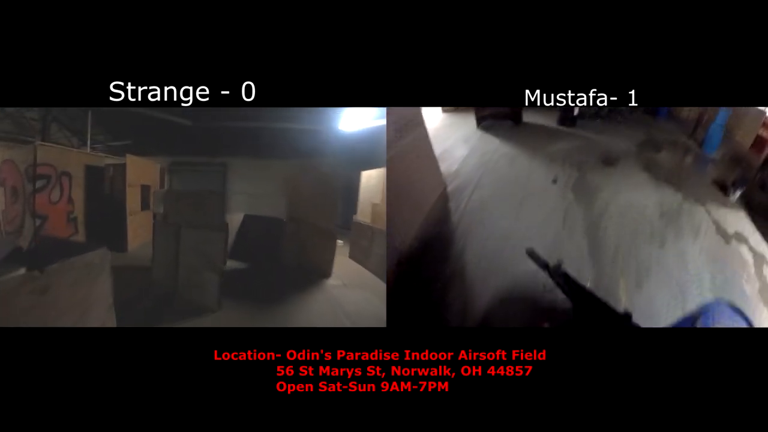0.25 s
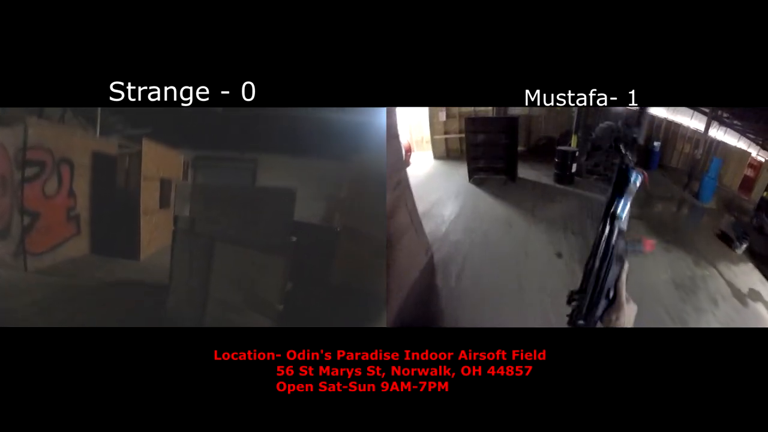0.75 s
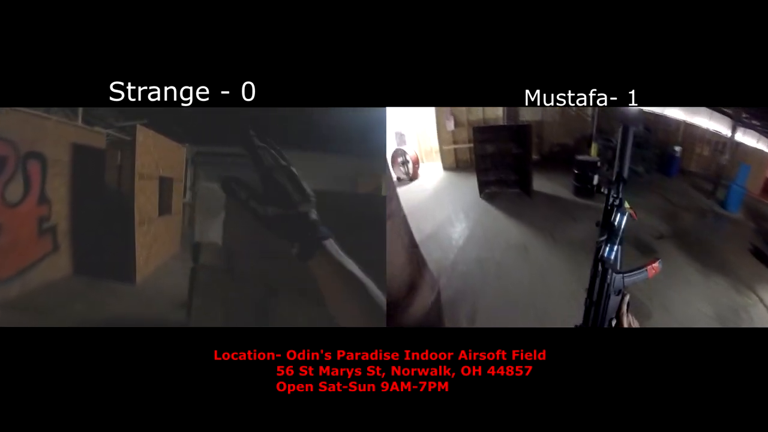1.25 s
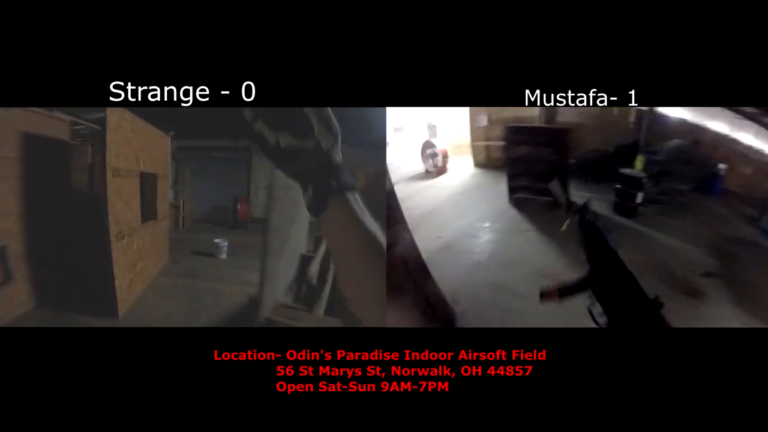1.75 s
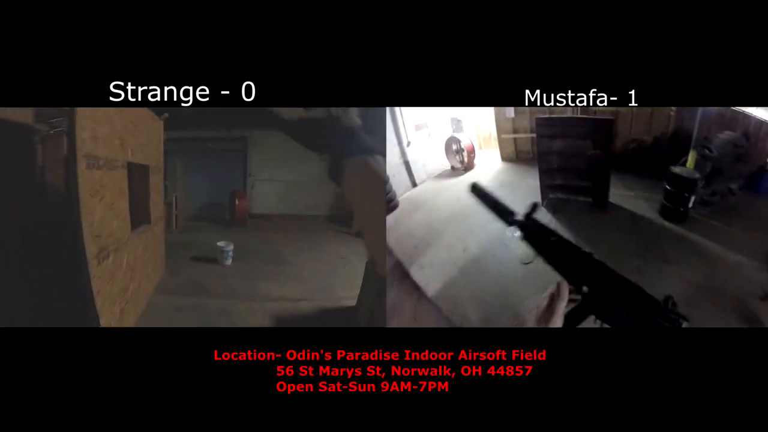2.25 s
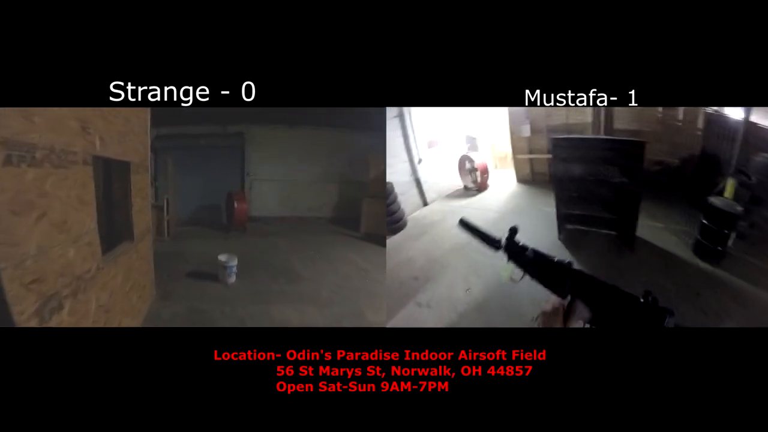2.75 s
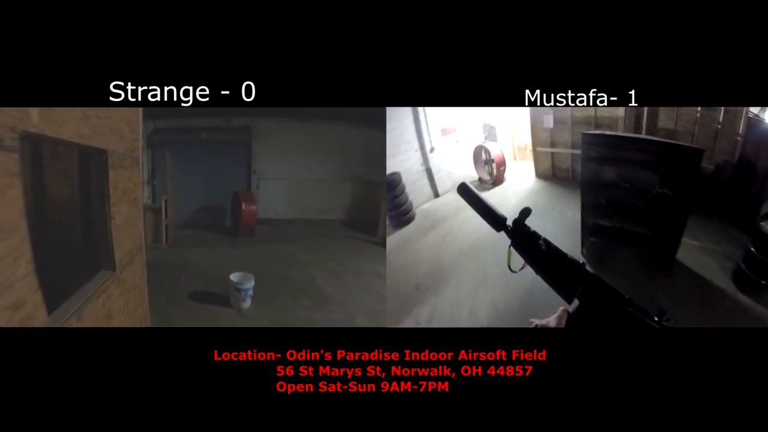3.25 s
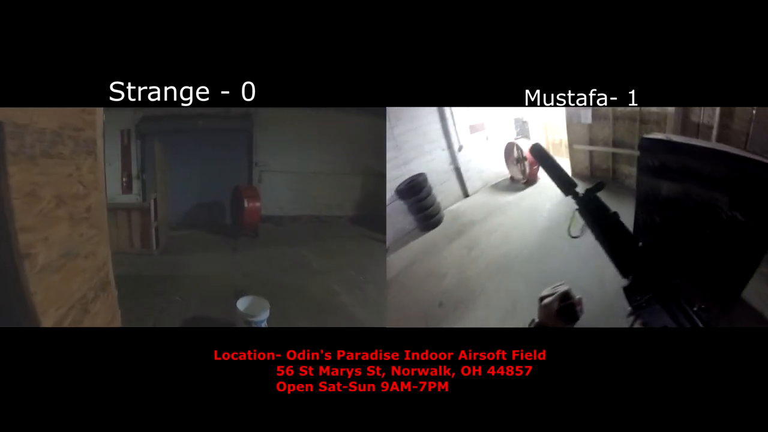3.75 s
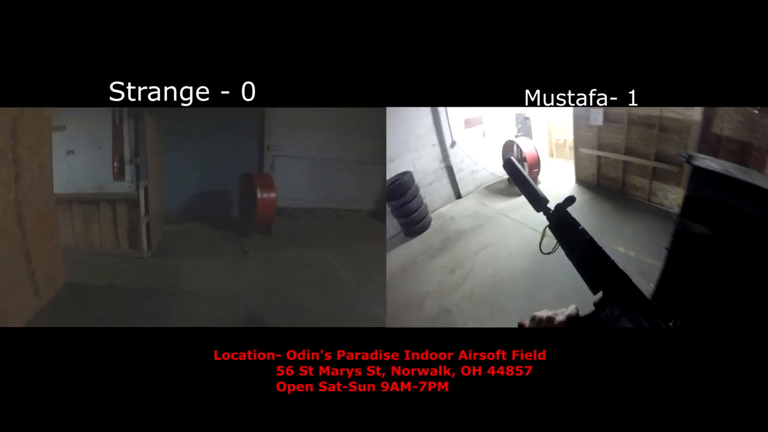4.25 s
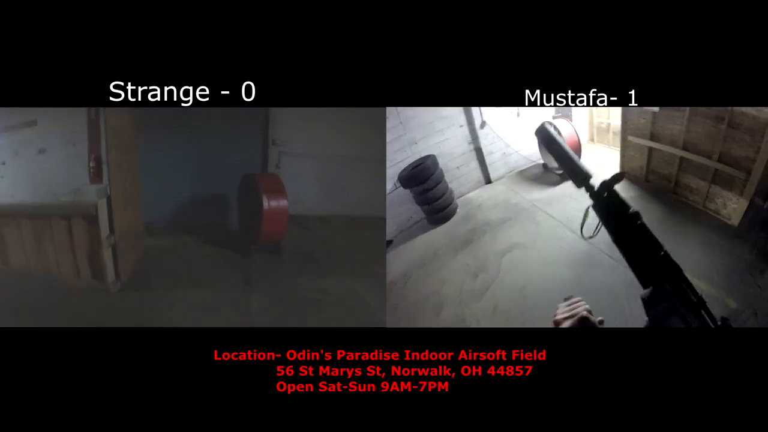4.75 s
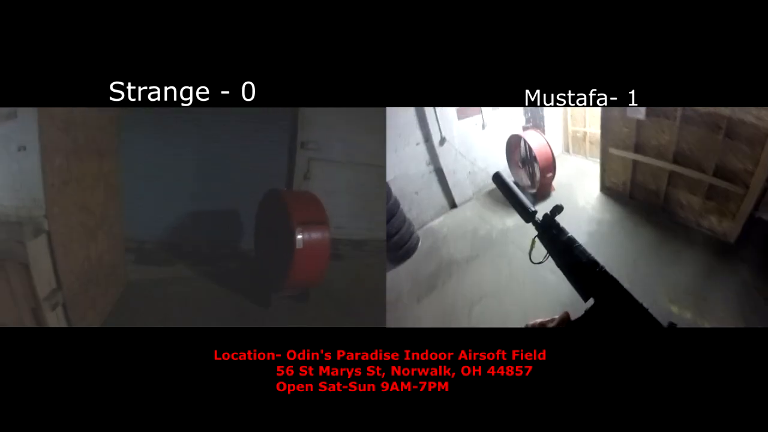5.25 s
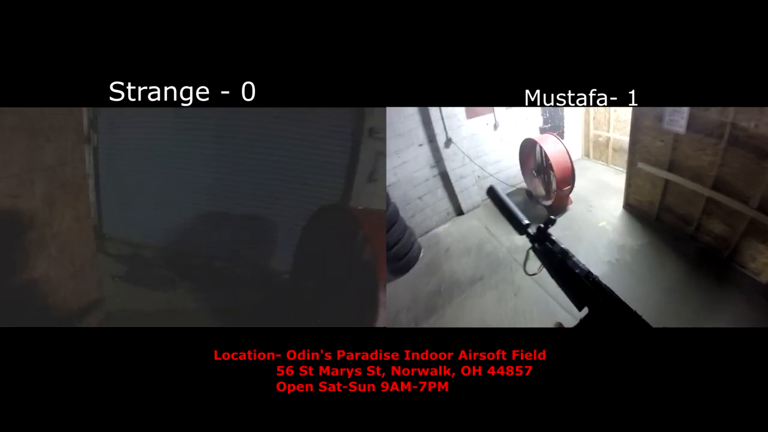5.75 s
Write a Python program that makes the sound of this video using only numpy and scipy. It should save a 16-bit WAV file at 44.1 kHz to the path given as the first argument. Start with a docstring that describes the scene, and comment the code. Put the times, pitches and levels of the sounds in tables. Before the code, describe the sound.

A low, wavering ventilation rumble fills a large hall for the whole six seconds. Two people walk, heard from microphones worn on their heads, their heels landing as soft, very deep, uneven thuds. For the first two seconds, plastic gear and buckles click busily right by the microphone, with tiny metal pings, a few faint knocks and rustling cloth. The clicks thin out, return briefly around 2.5 seconds, then cluster again near 3.4, 4.3 and 5.1 seconds. From about 3 seconds, the rushing air of a big drum fan fades in and grows steadily louder. From about 4.2 seconds, one blade grazes its guard with a short, high tick three or four times a second, getting clearer. Dull close knocks come between 5.2 and 5.5 seconds, and in the last second the fan's draught buffets the right side in low gusts.

```python
"""Walking up to a drum fan in a large hall

Two walkers wear cased head cameras, the first mono, the second stereo. Heel thuds come up through the
body; right by the microphones buckles and plastic gear click and cloth rustles. Farther off the
ventilation rumbles. A big drum fan grows louder as it is approached, one blade ticking once a turn,
its draught buffeting the second camera's right microphone port."""
import sys
import numpy as np
from scipy import signal
from scipy.fft import rfft, irfft, next_fast_len
from scipy.io import wavfile
from scipy.ndimage import uniform_filter1d, map_coordinates

SR = 44100
rng = np.random.default_rng(int(sys.argv[2]) if len(sys.argv) > 2 else 0)


def file_out(sig):
    """Save sig as 16-bit WAV at sys.argv[1]."""
    # one column per channel
    cols = np.atleast_2d(sig).T
    # limit, then scale
    lim = np.clip(cols, -1, 1)
    pcm = np.round(lim * 32767).astype(np.int16)
    wavfile.write(sys.argv[1], SR, pcm)


N = 264291
TIME = np.arange(N) / SR


def amp(db):
    return 10 ** (np.asarray(db) / 20)


def unit_rms(x):
    return x / np.sqrt(np.mean(x ** 2) + 1e-20)


def along(points, hz):
    """Interpolates (f/Hz, value) points on a log frequency axis."""
    f, values = np.transpose(points)
    return np.interp(np.log(hz + 1), np.log(f + 1), values)


def curves(rows):
    """One value per sample for each column after the time."""
    times, *columns = np.transpose(rows)
    return [np.interp(TIME, times, column) for column in columns]


def wobble(rate):
    """A smooth random curve, rate knots a second."""
    return map_coordinates(rng.standard_normal(int(N * rate / SR) + 4), [TIME * rate])


def filtered(x, response):
    """Passes x through a complex response of frequency."""
    size = next_fast_len(N + SR // 2)
    return irfft(rfft(x, size) * response(np.fft.rfftfreq(size, 1 / SR)), size)[..., :N]


def lowpass(hz, cutoff_hz):
    return 1 / (1 + (hz / cutoff_hz) ** 4)


def resonances(modes, hz):
    """Causal response of (f/Hz, width/Hz, gain/dB) modes of alternating sign."""
    return sum((-1) ** k * amp(db) * 1j * hz * width / (centre ** 2 - hz ** 2 + 1j * hz * width)
               for k, (centre, width, db) in enumerate(modes))


def causal(gain):
    """The minimum-phase response with this gain: its sound starts at the blow."""
    cepstrum = irfft(np.log(gain + 1e-6))
    half = len(cepstrum) // 2
    return np.exp(rfft(np.r_[cepstrum[0], 2 * cepstrum[1:half], cepstrum[half], np.zeros(half - 1)]))


def rush(response, patchy_db, channels=1):
    """Coloured noise of rms 1 with patches of random gain in time and frequency."""
    spectra = signal.stft(rng.standard_normal((channels, N)), nperseg=512)[2]
    patches = uniform_filter1d(uniform_filter1d(rng.standard_normal(spectra.shape[1:]), 6, 0), 14, 1)
    noise = signal.istft(spectra * amp(patchy_db * unit_rms(patches)), nperseg=512)[1][:, :N]
    return unit_rms(filtered(noise, response))


def hum(hz, width_hz):
    """A tone of rms 1 that wavers in level and phase within a narrow band."""
    drift = filtered(rng.standard_normal((2, N)), lambda f: lowpass(f, width_hz))
    phase = 2 * np.pi * np.cumsum(hz * np.ones(N)) / SR
    return unit_rms((drift[0] + 1.8 * np.std(drift)) * np.cos(phase) + drift[1] * np.sin(phase))


def add(track, s, sound):
    """Mixes a sound in at time s."""
    part = track[round(s * SR):][:len(sound)]
    part += sound[:len(part)]


# Ventilation drones across the hall: t/s, deep f/Hz, deep relative level/dB, upper pair's ditto/dB
DRONES = [(0, 104, -34, -33), (.15, 106, -42, -43), (.35, 106, -38, -34), (.85, 95, -48, -36),
          (1, 108, -50, -34), (1.6, 85, -42, -39), (2.5, 105, -44, -40), (3.1, 99, -44, -48),
          (3.45, 95, -39, -44), (3.8, 98, -38, -50), (4.1, 94, -29.5, -42), (4.3, 93, -31, -44),
          (4.4, 93, -40, -44), (4.85, 100, -40, -39), (5.1, 90, -40, -41), (5.4, 82, -36, -42),
          (5.85, 79, -32, -48), (5.99, 77, -42, -40)]
# Pitch of the middle drone: t/s, f/Hz
MIDDLE_PITCH = [(0, 130), (.4, 127), (.85, 137), (1.05, 127), (1.6, 123), (2.2, 139), (2.9, 138),
                (3.4, 130), (5.99, 130)]
# Duct resonances: f/Hz, width/Hz, gain/dB
DUCT_MODES = [(24.728, 21.57, 0), (46.607, 18.193, 3.5), (83.43, 83.59, -4), (143.24, 78.49, -2),
              (229.46, 80.7, -8)]


def ventilation():
    """Ducts rumble under three wavering drones, the deepest with its octave, and two faint tones."""
    deep_hz, deep_db, pair_db = curves(DRONES)
    deep = amp(deep_db - 2.5) * hum(deep_hz, width_hz=12.702)
    middle = amp(pair_db - 3.5 + .7 * wobble(3.0084)) * hum(curves(MIDDLE_PITCH)[0], width_hz=6)
    upper = amp(pair_db - 5 + .7 * wobble(3.0114)) * hum(156 + 2.5 * wobble(2.5), width_hz=6)
    octave = amp(deep_db - 13) * hum(2 * deep_hz, width_hz=9.52)
    tones = amp(-66.5) * hum(799, width_hz=32.1) + amp(-64.5) * hum(1054, width_hz=44.37)
    rumble_db = -35 + .4474 * wobble(3.2723)
    rumble = rush(lambda hz: resonances(DUCT_MODES, hz) * lowpass(hz, 300), patchy_db=-.5988)
    return deep + middle + upper + octave + tones + amp(rumble_db) * rumble


# Room tone from the far parts of the hall: f/Hz, relative density/dB
HALL_SPECTRUM = [(120, -33), (200, -4.5), (300, -7.5), (420, -17), (680, -24.5), (800, -21), (900, -23.5),
                 (1060, -20), (1400, -25.5), (2300, -31.5), (4300, -38.5), (5100, -42), (6000, -47.5),
                 (10000, -51.5), (15500, -65)]
# Room tone along the walk: t/s, level/dB
HALL_LEVELS = [(0, -46.5), (2, -46.5), (4, -44.5), (5, -43.5), (5.99, -40.5)]
OPENING_S = .04965  # time scale of a rush that dies away in the first moment


def hall():
    """Distant broad noise, briefly louder at the start, then rising slowly."""
    level_db = curves(HALL_LEVELS)[0] + 11 * np.exp(-TIME / OPENING_S)
    return amp(level_db) * rush(lambda hz: amp(along(HALL_SPECTRUM, hz)), patchy_db=1)


# The fan from close by: f/Hz, relative density/dB
FAN_SPECTRUM = [(20, -17.5), (60, 3.5), (90, -11.5), (170, -8), (230, -2), (330, -9.5), (450, -13.5),
                (790, -16.5), (1150, -15), (1500, -22.5), (2000, -25.5), (2600, -37), (6400, -38),
                (8300, -37.5), (9200, -51.5), (15000, -60.5)]
# The fan as the second camera closes in, ahead of its ports: t/s, level/dB
FAN_APPROACH = [(2.65, -110), (2.8, -68.5), (3.1, -58), (3.6, -51.5), (4.6, -45.5), (5.99, -38)]


def fan():
    """Rushing air, a direct and a diffuse part: a short noise fades out at the very start, later the long
    approach."""
    opening = amp(-43 - 20 * TIME / OPENING_S)
    level = amp(curves(FAN_APPROACH)[0]) + opening
    return level * rush(lambda hz: amp(along(FAN_SPECTRUM, hz)), patchy_db=.5, channels=2)


# Knocks close to a camera: t/s, level/dB, f/Hz, t60/s, edge level/dB, camera (0 first, 1 second)
NEAR_KNOCKS = [(.028, -40, 800, .08, -52, 0), (.535, -40, 590, .05, -46, 0),
               (1.305, -40, 1050, .07, -60, 0), (1.46, -45, 800, .07, -58, 0), (1.76, -38, 248, .9, -70, 0),
               (5.174, -14.5, 187.7, 0.0556, -30, 1), (5.355, -26, 190, .06, -60, 1),
               (5.486, -18, 138.1, 0.13807, -59.5, 0)]


def knocks():
    """Dull knocks, one track per camera: a damped low mode with a short edge of noise."""
    bodies, edges = np.zeros((2, N)), np.zeros((2, N))
    t = np.arange(SR // 4) / SR
    attack = 1 - np.exp(-t / .003185)
    for s, db, hz, t60, edge_db, camera in NEAR_KNOCKS:
        add(bodies[round(camera)], s, -amp(db - 60 * t / t60) * np.sin(2 * np.pi * hz * t) * attack)
        add(edges[round(camera)], s, amp(edge_db - 60 * t / .02798) * rng.standard_normal(len(t)))
    return bodies + filtered(edges, lambda hz: resonances([(1500, 3000, 0)], hz) ** 2)


# Heels, heard at the head through the body: deepest swing t/s, peak level/dB, f/Hz, roll-out/cycles
HEEL_BLOWS = [(.069, -19.5, 24, 1), (.67, -21, 23, 1.2), (1.152, -26, 24, 1), (1.316, -22, 22, 1.2),
              (1.479, -18.5, 34, .6), (1.94, -20.5, 24, 1.2), (2.43, -30, 45, .8), (2.642, -22, 21, 1.3),
              (3.292, -19, 22, 1.8), (3.974, -22.5, 24, .8), (4.634, -19.5, 22, 1.8), (4.925, -28, 35, .8),
              (5.322, -22, 21, 1.5), (5.605, -26, 45, 1)]


def heel_thuds():
    """Each blow is a soft low swing that swells within a cycle and rolls out."""
    out, swell_cycles = np.zeros(N), .55
    for s, db, hz, roll_cycles in HEEL_BLOWS:
        cycles = (TIME - s) * hz
        envelope = np.exp(-(cycles / np.where(cycles < 0, swell_cycles, roll_cycles)) ** 2)
        out -= amp(db) * envelope * np.cos(2 * np.pi * cycles)
    return out


# Modes of the plastic gear at the microphone: f/Hz, width/Hz, gain/dB
GEAR_MODES = [(1700, 520, -3.5), (2323.3, 177.8, -9), (2600, 600, -3.5), (3450, 850, -3.5), (4100, 450, -8),
              (4470, 300, -6.5), (4850, 500, -8.5), (5620, 450, -4.5), (6000, 600, -4.5), (6500, 700, -4.5),
              (7385, 750, -2.5), (8503.7, 1053.7, -2), (11100, 2600, -6.5), (12400, 500, -5.5),
              (13831, 2723, -8)]
# Borders between the low, middle, upper and top groups of modes: f/Hz
GROUP_BORDERS = [2900, 5200, 7000]


def through_gear(drives):
    """Four signals each drive a group of modes; a mode acts twice, in the part and in the case."""
    def response(hz, group):
        modes = [mode for mode in GEAR_MODES if np.searchsorted(GROUP_BORDERS, mode[0]) == group]
        gain = sum(np.abs(resonances([mode], hz)) ** 2 for mode in modes)
        return causal(gain * lowpass(hz, cutoff_hz=[4500, 7494, 9458, 19960][group]))
    return [filtered(drive, lambda hz: response(hz, group)) for group, drive in enumerate(drives)]


# Buckles and gear touching, close up:
# t/s, relative level/dB, low share/dB, upper share/dB, top share/dB, ring f/Hz, ring offset/dB
GEAR_CONTACTS = [(0.0933, -46, -3, -7, -13.5, 3560, -17), (0.1104, -54, -5, -5, -8, 3850, -9),
                 (0.126, -48, -6, -4, -12, 3900, -9), (0.1427, -47, -15, -4, -15, 3920, -16),
                 (0.1674, -41, -21, -20, -17, 4040, -7), (0.1903, -48, -4, -7, -14, 1650, -7),
                 (0.2055, -51, -2, -5, -11, 2720, -6), (0.2185, -52, -11, -3, -15, 1670, -7),
                 (0.3363, -51, -5, -16, -14, 3280, -7), (0.4205, -48, -9, -29, -26, 2770, -14),
                 (0.4728, -40, -12, -9, -17, 3600, -14), (0.493, -45, -5, -20, -35, 2720, -14),
                 (0.5195, -50, -12, -3, -9, 4140, -22), (0.616, -41, -5, -8, -14, 1850, -10),
                 (.6234, -50, -6, -2, -12, 5910, -9), (0.6546, -42, -2, -16, -15, 1850, -8),
                 (0.7076, -44, -4, -6, -7, 1840, -8), (0.7157, -52, -3, -1, -11, 3460, -10),
                 (0.7588, -51, -4, -12, -12, 3880, -14), (0.8842, -45, -17, -12, -15, 4460, -5),
                 (0.8947, -53, -7, -10, -14, 4100, -12), (.9094, -51, -15, -14, -16, 4100, -6),
                 (0.9322, -43, -17, -12, -14, 4450, -6), (0.9783, -47, -9, -10, -11, 4500, -6),
                 (1.0782, -53, -6, -8, -8, 2840, -11), (1.1405, -46, -8, -10, -16, 4450, -13),
                 (1.1667, -49, -9, -9, -15, 4540, -12), (1.2053, -51, -3, -10, -10, 3400, -8),
                 (1.267, -62, -12, -7, -4, 8700, -12), (1.2855, -53, -3, -11, -9, 2220, -12),
                 (1.341, -61, -12, -4, -6, 5600, -12), (1.4254, -61, -12, -3, -5, 5600, -12),
                 (1.4964, -53, -6, -16, -26, 3050, -6), (1.5234, -53, -6, -16, -22, 3460, -6),
                 (1.5474, -58, -12, -2, -14, 5680, -9), (1.559, -50, -6, -8, -9, 3210, -18),
                 (1.6002, -47, -8, -10, -5, 4490, -18), (1.6154, -54, -6, -6, -8, 2960, -16),
                 (1.6304, -53, -8, -5, -6, 3210, -12), (1.6664, -59, -8, -8, -5, 7700, -12),
                 (1.7099, -48, -8, -14, -26, 3050, -8), (1.7594, -52, -10, -14, -22, 3300, -9),
                 (1.8083, -50, -17, -13, -30, 3540, -7), (1.8194, -57, -15, -2, -24, 6080, -9),
                 (2.4404, -53, -4, -15, -23, 3430, -18), (2.4808, -46, -11, -12, -30, 4370, -1),
                 (2.5606, -51, -4, -8, -24, 4330, -14), (2.6102, -55, -17, -13, -33, 4380, 6),
                 (3.203, -43, -5, -12, -28, 3360, -10), (3.2234, -51, -17, -4, -21, 3680, -11),
                 (3.293, -42, 0, -36, -36, 2070, -7), (3.3423, -48, -1, -18, -36, 1880, -5),
                 (3.3558, -43, -4, -24, -41, 2540, -11), (3.3685, -46, 0, -17, -33, 1800, -6),
                 (3.3839, -41, -1.5, -11, -27, 1600, -7), (3.407, -35, -3, -15, -28, 3700, -10),
                 (3.4388, -50, -11, -7, -22, 2540, -12), (3.453, -41, -18, -2, -18, 4470, -27),
                 (3.4686, -45, -15, -5, -24, 3860, -20), (3.483, -40.5, -10, -6, -24, 4320, -22),
                 (3.5085, -47, -6, -6, -27, 3350, -13), (3.6464, -56, -8, -5, -19, 3160, -17),
                 (3.9073, -59, -9, -6, -2, 1830, -16), (3.9684, -42, 0, -35, -41, 2080, -7),
                 (4.0607, -56, -5, 0, -30, 2420, -20), (4.1904, -41, -2, -16, -28, 1750, -11),
                 (4.2078, -42, -2, -6, -24, 2520, -23), (4.2245, -49, -3, -6, -18, 1670, -6),
                 (4.3156, -46, -1, -21, -29, 1860, -17), (4.3314, -50, -15, -1, -21, 4180, -14),
                 (4.3723, -43, -1, -11, -25, 1700, -13), (4.4398, -46, -1, -20, -30, 2540, -9),
                 (4.4465, -65, -6, -6, -4, 10500, -12), (4.5654, -56, -10, -1, -27, 2650, -11),
                 (4.6498, -44, 0, -28, -32, 2050, -4), (5.1154, -48, -3, -8, -25, 3560, -10),
                 (5.1349, -40, -3, -12, -25, 3550, -10), (5.1733, -46, -2, -10, -37, 1740, -8),
                 (5.2526, -46, -2, -11, -29, 1700, -10), (5.5243, -34, -1, -24, -26, 2600, -8),
                 (5.5424, -49, -3, -4, -20, 3430, -10)]
RING_T60_CYCLES, RING_REFERENCE_CYCLES = 140, 19  # the ring offset holds at the reference cycle


def gear_clicks():
    """Each contact is a scratchy burst into the four groups of modes; the struck part rings on."""
    t = np.arange(SR // 20) / SR
    drives, rings = np.zeros((4, N)), np.zeros(N)
    rise_s = np.array([[.001], [.0006], [.0005], [.0004]])
    blow_t60 = np.array([[.022], [.017], [.013], [.009]])
    rattle_t60 = np.array([[.09], [.08], [.06], [.04]])  # treble dies first
    rise = 1 - np.exp(-t / rise_s)
    envelopes = (amp(-60 * t / blow_t60) + amp(-10.5 - 60 * t / rattle_t60)) * rise
    for s, db, low_db, upper_db, top_db, hz, ring_db in GEAR_CONTACTS:
        middle_power = max(1 - np.sum(amp([low_db, upper_db, top_db]) ** 2), .015)
        shares_db = [low_db, 10 * np.log10(middle_power), upper_db, top_db]
        for drive, share_db, envelope in zip(drives, shares_db, envelopes):
            burst = envelope * rng.standard_normal(len(t))
            burst = burst + .7 * np.roll(burst, rng.integers(12, 60))  # a near reflection colours it
            add(drive, s, amp(db + share_db) * burst * np.linalg.norm(envelope) / np.linalg.norm(burst))
        ring_level = amp(db + ring_db - 60 * (t * hz - RING_REFERENCE_CYCLES) / RING_T60_CYCLES)
        phase = 2 * np.pi * hz * t + np.cumsum(rng.normal(0, .02, len(t)))
        add(rings, s, ring_level * rise[1] * np.sin(phase))
    gains_db = [24, 24.5, 26.5, 27.5]
    return rings + sum(amp(db) * group for db, group in zip(gains_db, through_gear(drives)))


# Cloth and straps moving just by the microphone:
# peak t/s, relative level/dB, time to rise 10 dB/s, time to fall 10 dB/s, sheen offset/dB
CLOTH_STROKES = [(.12, -51.5, .04, .3, -10), (.2, -53, .1, .06, -8), (.4, -54, .2, .3, -18),
                 (.48, -50, .008, 0.1906, -12), (.625, -52, .008, 0.19, -12.5),
                 (.715, -53, .008, 0.1285, -5), (.84, -53, .12, .1, -22), (.895, -51, .01, .35, -11.5),
                 (1.15, -55, .01, 0.4911, -9.5), (1.5, -52, .08, 0.3337, -18), (1.62, -53, .05, .1, -8),
                 (1.74, -50.5, .18, .14, -21), (2.48, -56.5, .06, 0.2544, -17.5),
                 (2.9, -55.5, .08, .15, -20.5), (3.05, -57, .06, .15, -20),
                 (3.212, -47.5, .006, 0.0993, -20.5), (3.38, -53, .04, .1, -20), (3.47, -49, .08, .07, -17),
                 (3.57, -57, .05, .1, -17), (3.66, -56, .03, .1, -14.5), (4.2, -48, .015, 0.1502, -14.5),
                 (4.33, -55.5, 0.153, .4, -16), (4.62, -59, .1, .15, -15), (5.13, -49.5, .015, 0.1606, -21),
                 (5.53, -45, .004, .07, -20.5), (5.92, -57, .1, .1, -9)]
REST_DB, REST_SHEEN_DB = -67, -76  # floors between strokes, on the same relative scale
SNAPS_PER_S, SNAP_DECAY_S = 150, .004698


def cloth_rustle():
    """Cloth hiss with tiny random snaps, heard through the gear's modes; each stroke swells and fades."""
    s, db, rise_s, fall_s, sheen_db = np.transpose(CLOTH_STROKES)[:, :, None]
    since_peak = TIME - s
    stroke_db = db + 10 * np.minimum(since_peak / rise_s, -since_peak / fall_s)
    body = amp(np.maximum(stroke_db.max(0), REST_DB))
    sheen = amp(np.maximum((stroke_db + sheen_db).max(0), REST_SHEEN_DB))
    snapping = rng.random((4, N)) < SNAPS_PER_S / SR
    snaps = snapping * amp(3.251 * np.minimum(rng.exponential(size=(4, N)), 3))
    grain = 1 + .718 * signal.lfilter([1], [1, -np.exp(-1 / (SNAP_DECAY_S * SR))], snaps)
    low, middle, upper, top = map(unit_rms, through_gear(grain * rng.standard_normal((4, N))))
    return amp(-4.5) * body * (amp(-.5) * low + middle + amp(-7.5) * upper) + amp(-2.5) * sheen * top


# Small metal buckles, close up: t/s, level/dB, f/Hz
BUCKLE_PINGS = [(.1674, -48, 7620), (.169, -52, 9350), (.616, -49, 11800), (.6546, -49, 11500),
                (.7076, -44, 8500), (.7588, -51, 8300), (1.6002, -48, 7860), (1.6154, -52, 12000),
                (3.4388, -50, 12100), (3.453, -52, 12100), (4.652, -54, 9300)]


def buckle_pings(t60_s=.03):
    """Each thin ping is one slightly unsteady mode of the metal."""
    out, t = np.zeros(N), np.arange(SR // 20) / SR
    for s, db, hz in BUCKLE_PINGS:
        phase = 2 * np.pi * hz * t + np.cumsum(rng.normal(0, .05, len(t)))
        add(out, s, amp(db - 60 * t / t60_s) * np.minimum(t / .001, 1) * np.sin(phase))
    return out


# Blade on guard, heard over the last steps to the fan: t/s, relative level/dB
BLADE_GRAZES = [(4.2404, -51), (4.5326, -49), (4.8219, -52), (4.8514, -46), (5.1088, -49), (5.1377, -47),
                (5.4006, -41), (5.4331, -52), (5.691, -38), (5.9804, -35)]
# Resonances of the scrape: f/Hz, width/Hz, gain/dB
SCRAPE_MODES = [(6700, 900, -2.5), (7750, 1100, 0)]


def blade_ticks(scrape_t60_s=.035, tail_t60_s=.12):
    """One blade grazes its guard once a turn, at times twice: a short high scrape with a faint tail."""
    out, t = np.zeros(N), np.arange(SR // 10) / SR
    envelope = (amp(-60 * t / scrape_t60_s) + amp(-14 - 60 * t / tail_t60_s)) * np.minimum(t / .001, 1)
    for s, db in BLADE_GRAZES:
        scrape = envelope * rng.standard_normal(len(t))
        add(out, s, amp(db) * scrape * np.linalg.norm(envelope) / np.linalg.norm(scrape))
    return amp(11) * filtered(out, lambda hz: resonances(SCRAPE_MODES, hz) ** 2)


def draught(nearest_db=-33.5, gust_db=4):
    """Close to the fan, its wind buffets the second camera's right port in low gusts."""
    buffeting = rush(lambda hz: lowpass(hz, 40), patchy_db=1.5)
    approach_db = 1.8 * (curves(FAN_APPROACH)[0] - FAN_APPROACH[-1][1])  # grows faster than the rush
    right_only = np.array([[0], [1]])
    return right_only * amp(nearest_db + approach_db + gust_db * wobble(5)) * buffeting


# The second camera's microphone pair: f/Hz, left minus right/dB, right lead/rad, likeness (0-1)
MICROPHONE_PORTS = [(30, 1.5, -0.22, 0.74), (100, -15.5, -0.32, 0.93), (167.66, 8, -0.38, 0.44),
                    (277.7, 14.5, 0.64, 0.97), (451.8, 16.5, 0.09, 0.93), (733.4, 12, 0.1, 1),
                    (1098.7, 9, -0.02, 1), (1800, 1.5, -0.35, 0), (2966, 14.5, -0.37, 0.36),
                    (5960.5, -2, 0, 1), (12010, 2.5, 0, 0.96)]


def second_camera(direct, diffuse):
    """Its two ports differ in level and phase; the diffuse sound pulls them apart."""
    hz, lean_db, lead, likeness = np.transpose(MICROPHONE_PORTS)
    side = np.array([[.5], [-.5]])  # left, right

    def ports(f):
        return amp(side * along(np.c_[hz, lean_db], f)) * np.exp(-1j * side * along(np.c_[hz, lead], f))

    def spread(f):
        return np.arccos(np.clip(along(np.c_[hz, likeness], f), 0, 1)) / 2

    shared = filtered(direct, lambda f: ports(f) * np.cos(spread(f)))
    opposed = filtered(diffuse, lambda f: 2 * side * ports(f) * np.sin(spread(f)))
    return shared + opposed


def scene():
    """The first camera is mono and sits in the middle; the second adds the fan in stereo."""
    fan_direct, fan_diffuse = fan()
    first_knocks, second_knocks = knocks()
    centre = ventilation() + hall() + first_knocks + heel_thuds()
    centre = centre + gear_clicks() + buckle_pings() + cloth_rustle() + blade_ticks()
    return centre + second_camera(fan_direct + second_knocks, fan_diffuse) + draught()


def record(dry):
    """The cameras roll off below 12 Hz and above 14.5 kHz, and pass nothing over 15.55 kHz."""
    return filtered(dry, lambda hz: hz ** 2 / (hz ** 2 + 12 ** 2) * (hz < 15550) / (1 + (hz / 14500) ** 8))


dry = scene()
out = record(dry)
file_out(out)
```